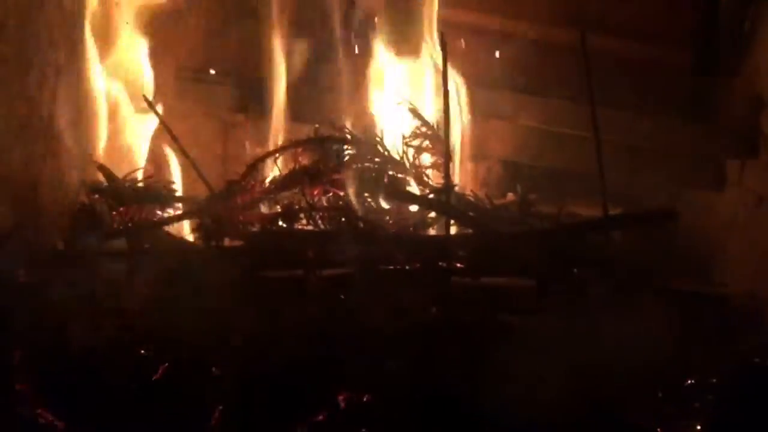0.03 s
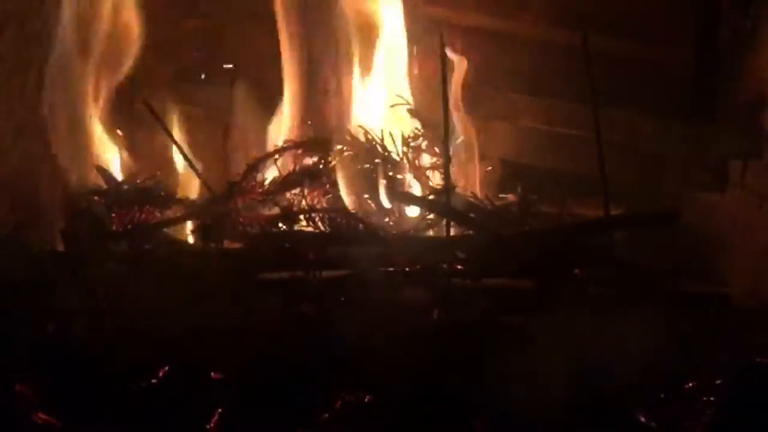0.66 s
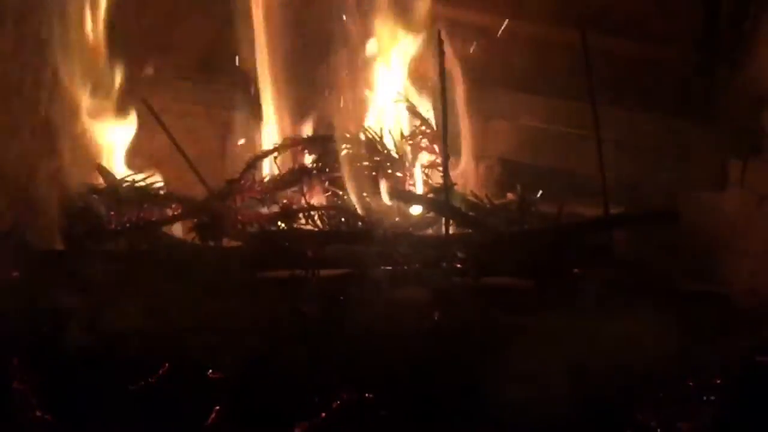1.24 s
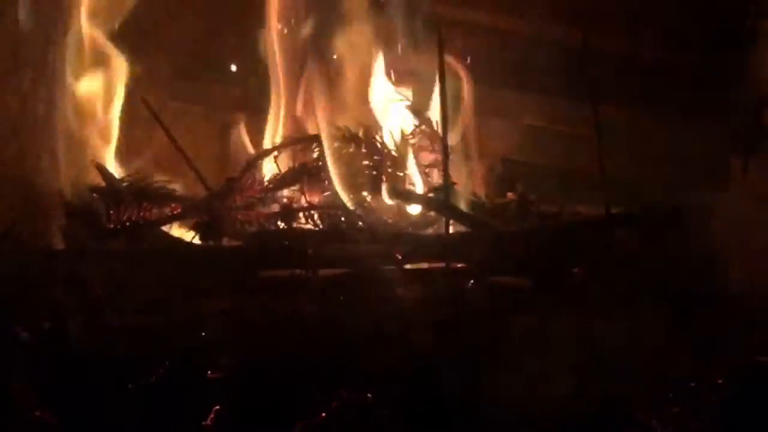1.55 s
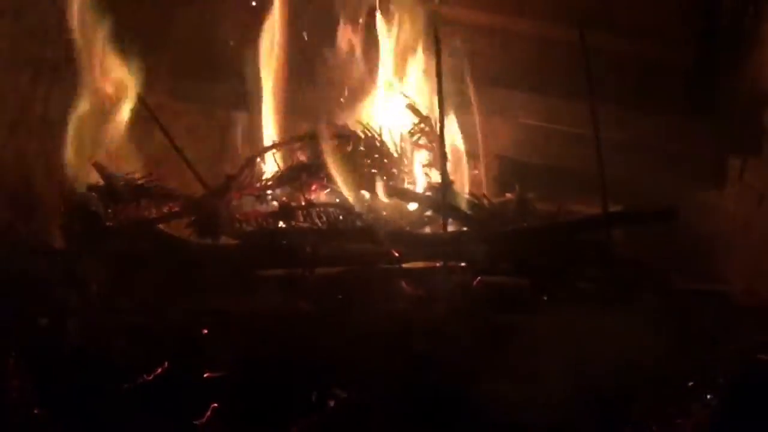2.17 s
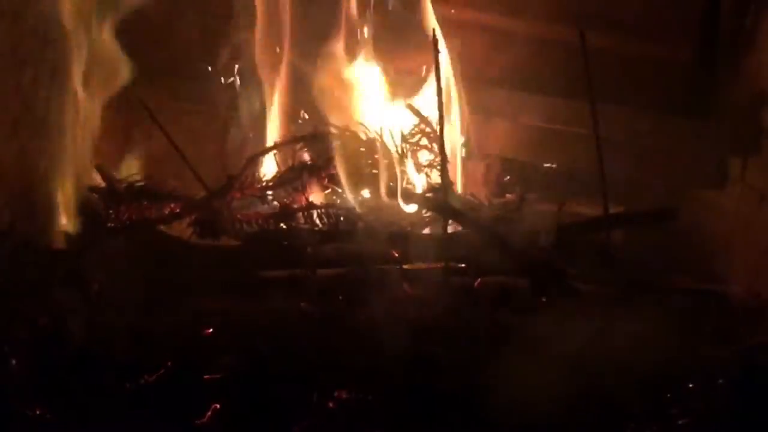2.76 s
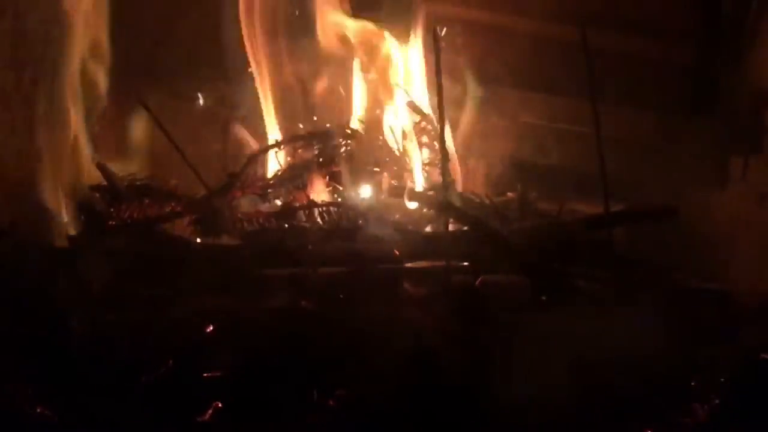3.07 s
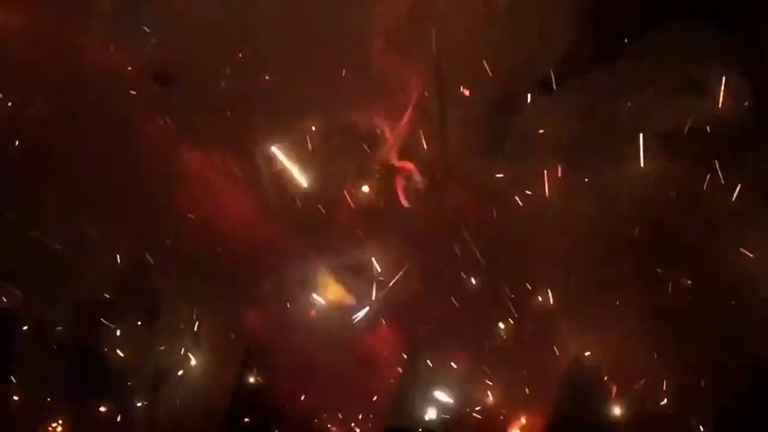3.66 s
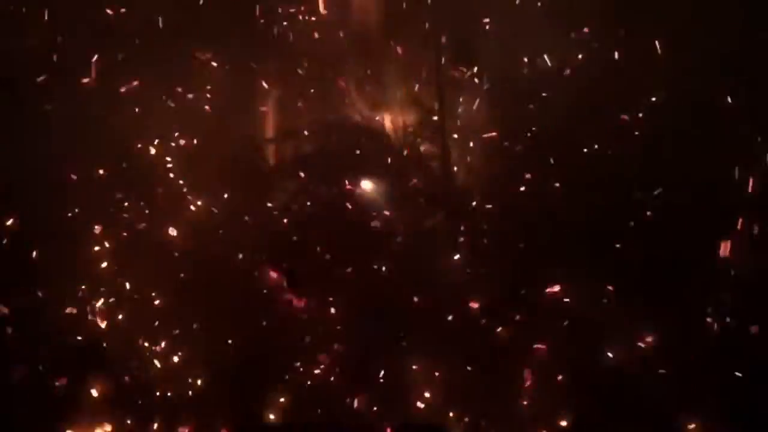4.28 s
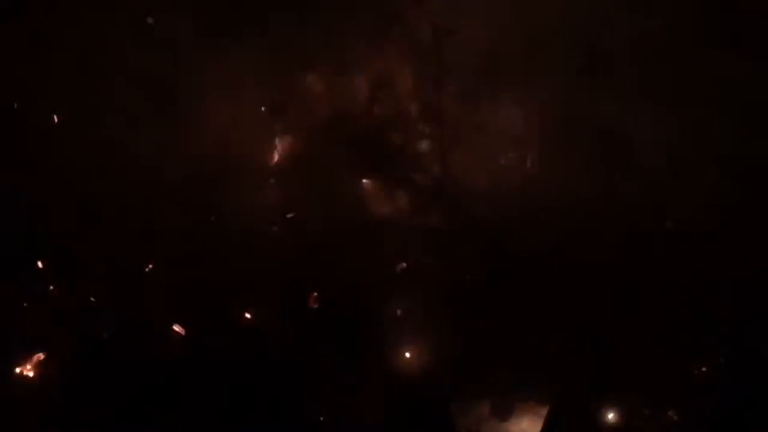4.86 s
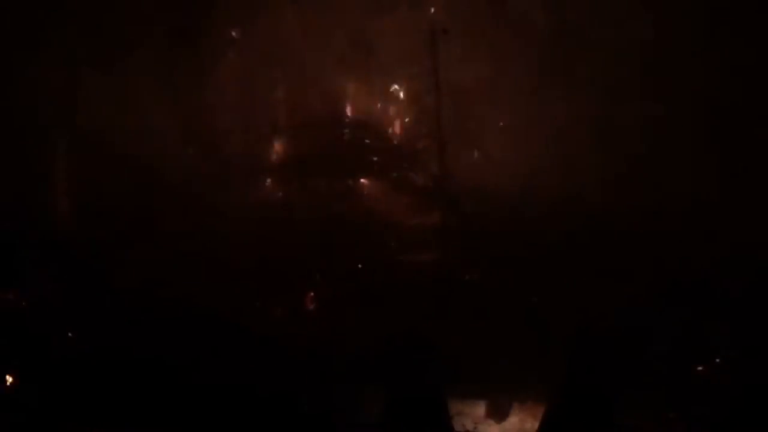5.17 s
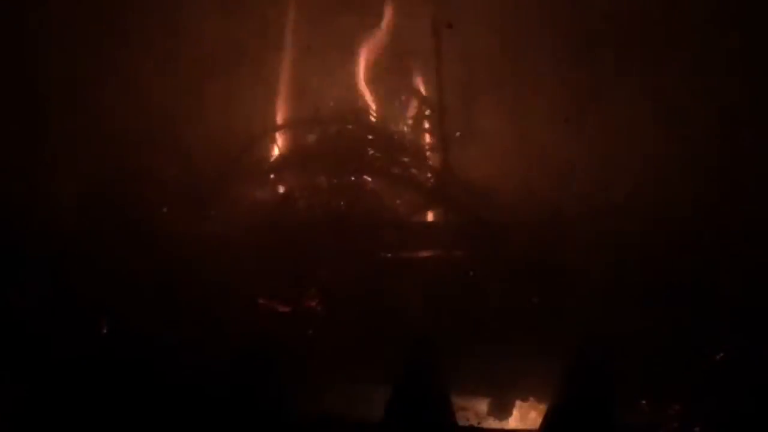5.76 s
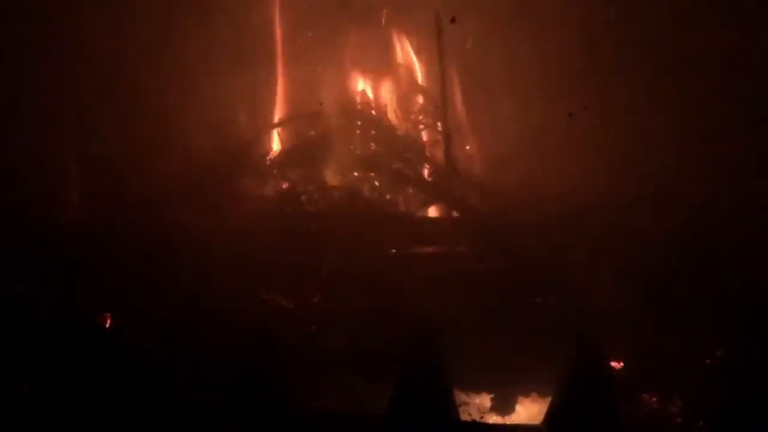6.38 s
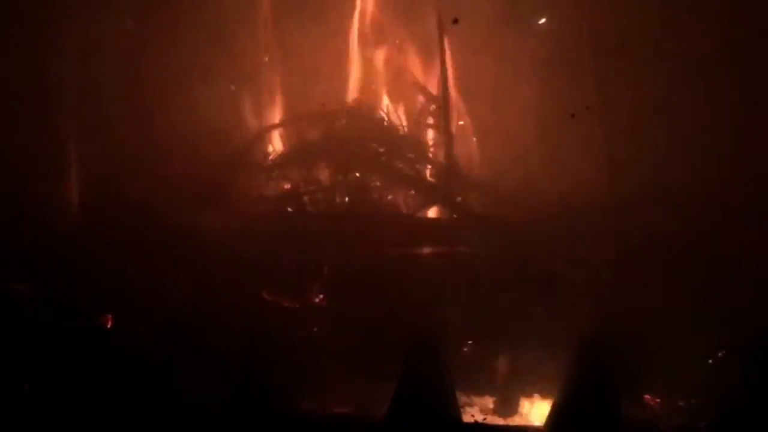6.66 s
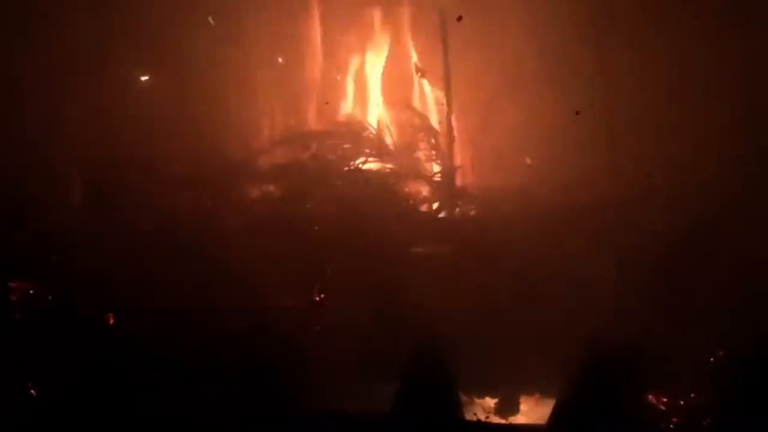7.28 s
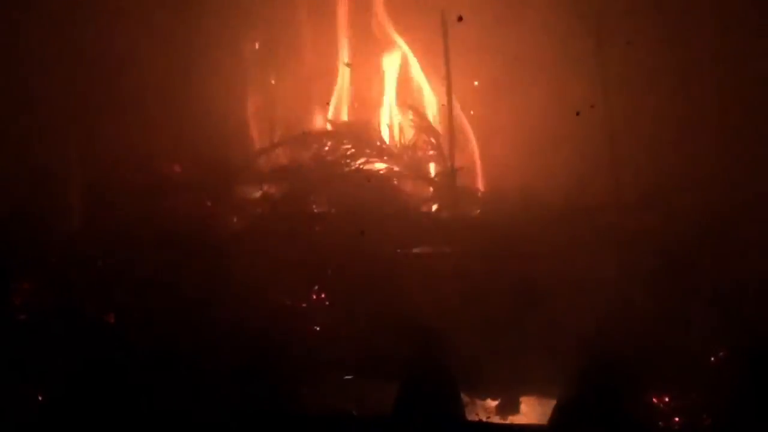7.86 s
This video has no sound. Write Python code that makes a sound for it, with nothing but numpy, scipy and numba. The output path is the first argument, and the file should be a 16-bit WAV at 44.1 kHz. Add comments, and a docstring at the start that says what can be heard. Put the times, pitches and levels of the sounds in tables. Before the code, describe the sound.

A wood fire crackles faintly in a fireplace until a small firework bursts in loud, rapid pops, followed by two sharp cracks.

```python
"""Just in front of a fireplace, where a small firework goes off in a wood fire.
Flames rumble, embers fizz and twigs snap. The powder flares, then bursts into a volley of pops with
gusts of gas; two late stars crack on their own, and afterwards a thin jet of steam sings.
The firebox colours every pop, its ironwork rings on, and a limiter holds the peaks."""
import sys
import numpy as np
from scipy import signal
from scipy.fft import rfft, irfft
from scipy.io import wavfile
from scipy.ndimage import uniform_filter1d, minimum_filter1d
from numba import njit

SR = 44100
rng = np.random.default_rng(int(sys.argv[2]) if len(sys.argv) > 2 else 0)


def waveform_to_disk(signal):
    """Save audio, clipped to [-1, 1], as 16-bit WAV at the path in sys.argv[1]."""
    frames = np.transpose(np.atleast_2d(signal))
    scaled = np.clip(frames, -1, 1) * 32767
    samples = np.round(scaled).astype(np.int16)
    wavfile.write(sys.argv[1], SR, samples)


N = 353946
T = np.arange(N) / SR
TOP_HZ = 16000


def undb(db):
    """Decibels to gain."""
    return 10 ** (np.asarray(db) / 20)


def unit(x):
    """Scale to rms 1."""
    return x / np.sqrt(np.mean(x ** 2))


def fade(t, t60_s):
    """Exponential decay."""
    return np.exp(-np.log(1000) * t / t60_s)


def spell(start_s, end_s, attack_s, t60_s):
    """Envelope: rise, hold until the end, decay."""
    return np.clip((T - start_s) / attack_s, 0, 1) * fade(np.maximum(T - end_s, 0), t60_s)


def drift(rate_hz):
    """Smooth random drift, rms 1."""
    step = SR // rate_hz
    stairs = np.repeat(rng.standard_normal(N // step + 1), step)
    return unit(uniform_filter1d(stairs, step)[:N])


def add(out, start_s, sound):
    """Mix a sound in at a time."""
    i = int(start_s * SR)
    out[i:i + len(sound)] += sound[:N - i]


def through(x, impulse):
    """Convolve, keeping the length."""
    return signal.fftconvolve(x, impulse)[:len(x)]


def on_log_axis(hz, table, column=1):
    """Interpolate a column over log frequency."""
    table = np.asarray(table, float)
    return np.interp(np.log(np.maximum(hz, 1)), np.log(table[:, 0]), table[:, column])


def response(colour, resonances=(), size=4096):
    """Minimum-phase impulse response of a spectrum with resonant humps."""
    hz = np.arange(size // 2 + 1) * SR / size
    humps_db = sum(db / (1 + (2 * (hz - centre) / width) ** 2) for centre, width, db in resonances)
    cepstrum = irfft(np.log(undb(on_log_axis(hz, colour) + humps_db)))
    cepstrum[1:size // 2] *= 2
    cepstrum[size // 2 + 1:] = 0
    return irfft(np.exp(rfft(cepstrum)))


def noise(colour, resonances=()):
    """Turbulence, rms 1, shaped by (Hz, dB) points."""
    return unit(through(rng.standard_normal(N), response(colour, resonances)))


# Air resonances and hollows of the firebox. Each row: centre in Hz, width in Hz, lift in dB.
FIREBOX = [(300, 25, 9), (486.4, 16, 8), (764, 160, 6.5), (829, 46, -9), (1468, 90, 1), (1570, 310, 5.5),
           (1870.4, 20, -5.5), (2197, 48, 5.5), (2686, 43, 6), (2910, 110, -5), (2970, 90, 4.5),
           (3808, 71, 5), (4270, 690, 4), (4660, 140, 2.5), (5560, 230, 4), (6200, 250, 1.5),
           (7550, 740, -3.5), (9472, 92, 0.5), (10470, 720, -6.5)]

def firebox_noise(colour):
    """Turbulence coloured by the air in the firebox."""
    return noise(colour, FIREBOX)


def walls(x, size=700):
    """Bricks a hand's length away add quick echoes that ripple the spectrum."""
    t = T[:size]
    echoes = rng.standard_normal(size) * fade(t, .025) * (t > .001)
    return x + undb(-11) * through(x, echoes / np.linalg.norm(echoes))


# Trend of the fire. Each row: time in seconds, vigour in dB.
VIGOUR = [(0, -1), (2.3, 1), (3.3, 3), (4.1, 2), (4.37, -9.5), (4.6, -2), (5.3, -1), (8.03, -.5)]
# Leaps of flame. Each row: peak time in seconds, added vigour in dB.
LEAPS = [(1.08, 3), (2.17, 3.5), (2.54, 4)]

def vigour_db(leap_s=.054):
    """The fire builds with brief leaps, is beaten down by the blast and recovers."""
    trend_db = np.interp(T, *np.transpose(VIGOUR))
    return trend_db + sum(db * np.exp(-((T - peak_s) / leap_s) ** 2) for peak_s, db in LEAPS)


# Spectra of flame rumble, flame rush and sap. Each row: frequency in Hz, relative level in dB.
RUMBLE_COLOUR = [(12, -41.5), (20, -12.5), (35, -8.5), (55, 2.5), (87, -6), (123, -5), (177, -20),
                 (308, -24.5), (443, -29.5), (500, -32), (650, -57), (1100, -120)]
RUSH_COLOUR = [(250, -29.5), (450, -9.5), (600, -3.5), (760, 0), (950, -1), (1200, -1), (1500, -1),
               (1900, -7), (2250, -11.5), (2800, -17.5), (4300, -18.5), (6300, -21), (15500, -35.5)]
SIZZLE_COLOUR = [(1200, -17.5), (1650, 1), (1850, -4.5), (2150, 3.5), (2700, -15.5), (3300, -1), (4400, -7),
                 (5000, -14.5), (9000, -13), (16000, -28)]

def flames():
    """Flames rumble and flutter while sap sizzles out of the twigs."""
    fire_db = vigour_db()
    flutter = drift(rate_hz=9)
    lick_db = 1.1 * flutter + drift(rate_hz=30)
    rumble = undb(-53 + .23 * fire_db + 1.7 * flutter) * noise(RUMBLE_COLOUR)
    rush = undb(-66.5 + .9 * fire_db + lick_db) * firebox_noise(RUSH_COLOUR)
    sizzle = undb(-76 + 1.5 * fire_db + 1.5 * drift(rate_hz=25)) * firebox_noise(SIZZLE_COLOUR)
    return rumble + walls(rush + sizzle)


# Spectrum of ember fizz. Each row: frequency in Hz, relative level in dB.
FIZZ_COLOUR = [(2500, -8), (4300, -1), (6500, 1), (7600, -1), (9500, -1), (10500, -2.5), (12000, -3),
               (16000, -6)]
# Spark showers. Each row: start in seconds, end in seconds, level at the end in dB.
SHOWERS = [(3.279, 3.669, -55.5), (4.6, 4.85, -66.5)]

def embers():
    """Embers fizz finely; each shower of sparks swells above them and burns out."""
    glow = undb(-74.5 + .2 * vigour_db())
    sparks = sum(undb(db) * spell(start_s, end_s, end_s - start_s, .12) ** 2
                 for start_s, end_s, db in SHOWERS)
    flicker = undb(.73 * drift(rate_hz=150))
    return np.hypot(glow, sparks) * flicker * firebox_noise(FIZZ_COLOUR)


def crack(impulse, t60_s, treble_db, split_hz, shock_db, size=4096):
    """A sharp shock, then its dense clatter off the close walls; the body has rms 1."""
    t = T[:size]
    clatter = rng.standard_normal(size) * fade(t, t60_s) * (1 - np.exp(-t / .0005))
    shock = undb(shock_db) * np.linalg.norm(clatter) * (t == 0)
    sound = through(shock + clatter, impulse)
    body = signal.sosfilt(signal.butter(4, split_hz, "low", fs=SR, output="sos"), sound)
    treble = signal.sosfilt(signal.butter(4, split_hz, "high", fs=SR, output="sos"), sound)
    return unit(body) + undb(treble_db) * unit(treble)


# Spectrum of splitting wood. Each row: frequency in Hz, relative level in dB.
SNAP_COLOUR = [(300, -6.5), (750, 0.5), (1600, 6), (2700, -5), (4200, -2.5), (7000, -9.5), (9500, -5.5),
               (10800, -16.5), (13000, -8), (16000, -12)]
# Twig snaps. Each row: start in seconds, relative level in dB, relative treble in dB.
SNAPS = [(0.165, -62, -15), (0.363, -60.5, -19), (0.602, -52, -24), (1.032, -56, -10), (1.281, -58.5, -17),
         (1.708, -61.5, -12), (1.935, -59.5, -18), (2.881, -60.5, -12), (3.192, -48, -24),
         (4.716, -60.5, -9), (6.409, -55, -13), (6.619, -50.5, -13), (6.687, -55.5, 1), (6.843, -50, 9),
         (7.271, -59, -15), (7.949, -54, 2.5)]

def twigs(tick_count=90):
    """Pockets of steam split the wood: a few clear snaps among many faint ticks."""
    out, wood = np.zeros(N), response(SNAP_COLOUR)
    for start_s, db, treble_db in SNAPS:
        snap = crack(wood, t60_s=.023, treble_db=treble_db - .5, split_hz=6000, shock_db=-6)
        add(out, start_s, undb(db - 12.5) * snap)
    for when, size in rng.random((tick_count, 2)):
        tick = crack(wood, t60_s=.02, treble_db=-8, split_hz=6000, shock_db=-8.5)
        tick_db = -88.5 + 12.5 * size ** 5  # strong ticks are rare
        add(out, when * N / SR, undb(tick_db) * tick)
    return out


# Spectra of powder hiss, roar and chimney draught. Each row: frequency in Hz, relative level in dB.
HISS_COLOUR = [(200, -25), (300, -12.5), (450, -16.5), (700, -2.5), (1000, -7.5), (1500, -4.5), (2200, -11),
               (2600, -17.5), (3700, -11.5), (5000, -21.5), (9000, -27.5), (16000, -36.5)]
ROAR_COLOUR = [(25, -9), (50, 3), (105, 12), (165, -9.5), (220, -7), (310, -8.5), (500, -17.5),
               (1000, -58.5)]
DRAUGHT_COLOUR = [(15, -15), (30, 0), (60, 0), (110, -18), (400, -50)]
# The fuse, then two powder burns. Each row: start and end in seconds, hiss, roar and draught in dB.
BURNS = [(3.402, 3.676, -40.5, -46, -45.5), (3.68, 3.71, -27.5, -27.5, -41),
         (3.761, 3.939, -21.5, -24, -42.5)]

def flare(attack_s=.025, sag_db_per_s=36):
    """Powder catches with a sputtering hiss that sags, while it roars on and drags air up the chimney."""
    hiss = roar = draught = 0
    for start_s, end_s, hiss_db, roar_db, draught_db in BURNS:
        sag_db = sag_db_per_s * np.maximum(T - start_s, 0)
        hiss += undb(hiss_db - sag_db) * spell(start_s, end_s, attack_s, t60_s=.12)
        blaze = spell(start_s, end_s, attack_s, t60_s=.25)
        roar += undb(roar_db) * blaze
        draught += undb(draught_db) * blaze
    sputter = undb(1.1 * drift(rate_hz=90))
    return (hiss * sputter * firebox_noise(HISS_COLOUR)
            + roar * firebox_noise(ROAR_COLOUR)
            + draught * noise(DRAUGHT_COLOUR))


# Spectrum of an exploding star. Each row: frequency in Hz, relative level in dB.
POP_COLOUR = [(100, -22), (160, -24.5), (300, -14.5), (550, -11.5), (750, -6.5), (1000, -3.5), (1600, -9),
              (2000, -8.5), (2700, -16.5), (4200, -8.5), (5100, -11), (6500, -10.5), (10000, -17.5),
              (13500, -20.5), (16000, -28)]

def pop(relative_db, treble_db, detune):
    """One star explodes in the firebox with a bark at its own pitch."""
    bark_hz = 1527 * (1 + .05 * detune)
    impulse = response(POP_COLOUR, [*FIREBOX, (bark_hz, 440, 7)])
    burst = crack(impulse, t60_s=.026, treble_db=treble_db, split_hz=3000, shock_db=-2.5)
    return undb(relative_db - 12.5) * burst


# Main powder pops. Each row: start in seconds, relative level in dB, treble against body in dB.
POPS = [(3.587, -36.5, 4.5), (3.6738, -13, 5.5), (3.6883, -6.5, -6), (3.706, -15.5, -2), (3.715, -8.5, -2),
        (3.719, -13, -1), (3.752, -10.5, 1), (3.768, -7, -1), (3.7776, -14.5, 7), (3.789, -9, -7.5),
        (3.794, -13.5, -0.5), (3.814, -17.5, 4), (3.817, -13.5, 0), (3.8274, -4.5, -6), (3.841, -14.5, 0),
        (3.854, -11, -7), (3.861, -8.5, -5.5), (3.88, -9, -1.5), (3.893, -11.5, -3), (3.903, -9, -6),
        (3.921, -12, -7), (3.926, -5.5, -6.5), (3.9436, -14.5, 1.5), (3.958, -12.5, -7), (3.968, -16.5, -3),
        (3.9866, -22.5, 2.5), (3.9937, -24.5, -1), (4.01, -29, 2), (4.028, -30.5, 2.5), (4.0327, -28, -4),
        (4.0475, -30.5, 0.5), (4.06, -22.5, 2.5), (4.074, -29, 0.5), (4.082, -23.5, 0.5),
        (4.0938, -22.5, 3), (4.098, -20.5, -5), (4.2185, -8.5, -7.5), (4.25, -24, 2.5), (4.4358, -8, -7.5)]

def volley(lesser_count=5, thick_s=(3.868, 3.935)):
    """Stars explode one after another; in the thick of it, lesser ones fill the gaps."""
    out = np.zeros(N)
    for k, (jitter, size, detune) in enumerate(rng.standard_normal((lesser_count, 3))):
        start_s = np.interp(k + .2 * jitter, [0, lesser_count - 1], thick_s)
        add(out, start_s, pop(-17.5 + 2 * size, treble_db=-1.5, detune=detune))
    for start_s, db, treble_db in POPS:
        add(out, start_s, pop(db, treble_db, detune=rng.standard_normal()))
    return out


# Modes of the ironwork. Each row: frequency in Hz, level in dB for a 0 dB blast, t60 in seconds.
IRON_MODES = [(103, -38, 0.81), (307, -47.5, 0.31), (400, -62, 1.2), (476, -59, 2.2), (665, -59.5, 1.5),
              (813, -28, 0.25), (799, -60, 0.99), (1000, -60, 1.5), (1040, -60.5, 1.8), (1110, -59, 1.1),
              (1459, -62, .6), (1790, -61, .7), (2680, -67, 1.3)]
# Blasts that shake it. Each row: time in seconds, strength in dB.
BLASTS = [(3.769, -15), (3.898, -16), (4.098, -3.5), (4.217, -10), (4.436, -0.5)]

def ironwork():
    """Blasts close to the metal of the hearth set it ringing: clear modes in a wash of weak ones."""
    t, blows = T[:2 * SR], np.zeros(N)
    for start_s, db in BLASTS:
        add(blows, start_s, undb([db]))
    modes = sum(undb(db) * fade(t, t60_s) * np.sin(2 * np.pi * hz * t) for hz, db, t60_s in IRON_MODES)
    wash = noise([(100, -6), (300, -.5), (1200, -2), (2700, -9.5), (6000, -30.5)])[:len(t)]
    return through(blows, modes + undb(-54) * fade(t, 1.8) * wash)


# Gas gusts. Each row: start in seconds, level in dB, first and last pitch in Hz, t60 in seconds.
GUSTS = [(3.782, -15, 240.1, 80, 0.059), (3.897, -2.5, 191.7, 41.84, .09), (3.948, -4.5, 150, 40, 0.057),
         (4.219, -34, 215.6, 110.5, .12), (4.436, -26.5, 222.5, 97.6, 0.25)]

def gusts(glide_s=.0034):
    """Each ball of hot gas shoves the air; its swing slows as it grows."""
    out, t = np.zeros(N), T[:SR // 4]
    for start_s, db, first_hz, last_hz, t60_s in GUSTS:
        hz = last_hz + (first_hz - last_hz) * np.exp(-t / glide_s)
        swing = -np.sin(2 * np.pi * np.cumsum(hz) / SR)
        add(out, start_s, undb(db) * fade(t, t60_s) * swing)
    return out


def steam(start_s=4.86, rise_s=1.2):
    """After the blast a thin jet of steam sings unsteadily through a split in the wood."""
    swell = np.clip((T - start_s) / rise_s, 0, 1)
    level_db = -85 + 3.8 * drift(rate_hz=8)
    whistle = noise([(2500, -24), (4300, .5), (7000, -39)], resonances=[(4320, 260, 37)])
    return swell * undb(level_db) * whistle


# Room echo. Each row: frequency in Hz, relative level in dB, t60 in seconds.
ROOM = [(100, -5.5, 0.82), (300, -8.5, 0.1), (800, -11, 0.1), (1700, -15, 0.22), (4500, -13, 0.23),
        (9000, -15.5, 0.16), (15000, -16, 0.19)]

def room(x, octaves=9, build_s=.0033):
    """Diffuse echo of a small furnished room, octave by octave; the bass lasts longest."""
    t, tail = T[:SR], 0
    for upper_hz in TOP_HZ / 2 ** np.arange(octaves):
        centre_hz = upper_hz / np.sqrt(2)
        octave = signal.butter(3, [upper_hz / 2, upper_hz], "band", fs=SR, output="sos")
        t60_s = on_log_axis(centre_hz, ROOM, column=2)
        envelope = fade(t, t60_s) * (1 - np.exp(-t / build_s))
        band = unit(signal.sosfilt(octave, rng.standard_normal(SR)) * envelope)
        tail += undb(on_log_axis(centre_hz, ROOM)) * band * np.sqrt(upper_hz) / SR
    return through(x, tail)


def scene():
    """Firework and fire in the hearth, mono; only pops and twigs echo in the room."""
    cracks = volley() + twigs()
    firework = ironwork() + gusts() + flare()
    fire = walls(embers()) + flames() + steam()
    return (cracks + room(cracks) + firework + fire)[None]


@njit
def peak_follower(x, release_s):
    """Jumps to every peak and sinks back exponentially."""
    decay = np.exp(-1 / (release_s * SR))
    out, held = np.empty(len(x)), 0.
    for i in range(len(x)):
        held = max(abs(x[i]), held * decay)
        out[i] = held
    return out


def record(dry, ceiling=1.5, window_samples=45, clip_level=.92):
    """A fast limiter pulls the blasts down, a soft clip rounds their peaks, and the top is cut."""
    peak = peak_follower(dry[0], release_s=.0088)
    gain = minimum_filter1d(ceiling / np.maximum(peak, ceiling), window_samples)
    limited = dry * uniform_filter1d(gain, window_samples)
    rounded = limited / (1 + (limited / clip_level) ** 4) ** (1 / 4)
    lowpass = signal.ellip(10, .2, 85, TOP_HZ, fs=SR, output="sos")
    return signal.sosfilt(lowpass, rounded)


dry = scene()
out = record(dry)
waveform_to_disk(out)
```